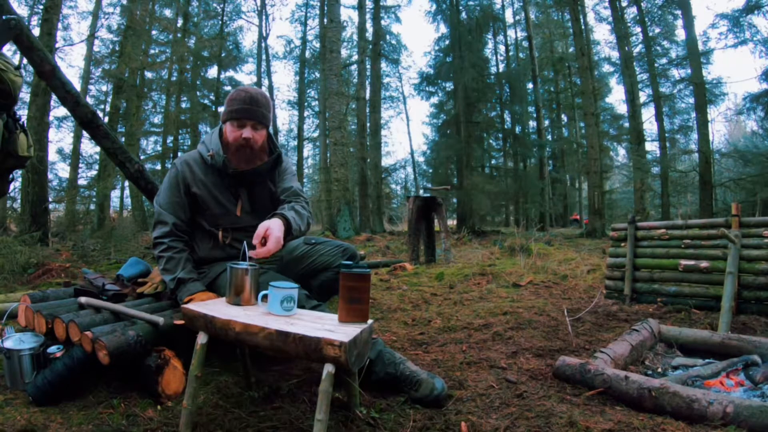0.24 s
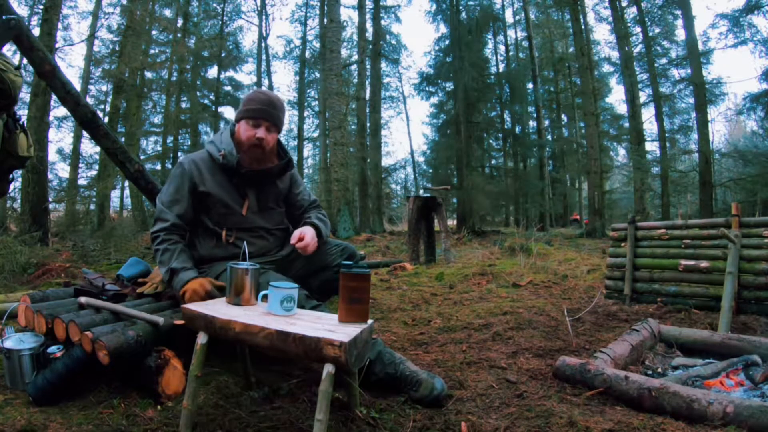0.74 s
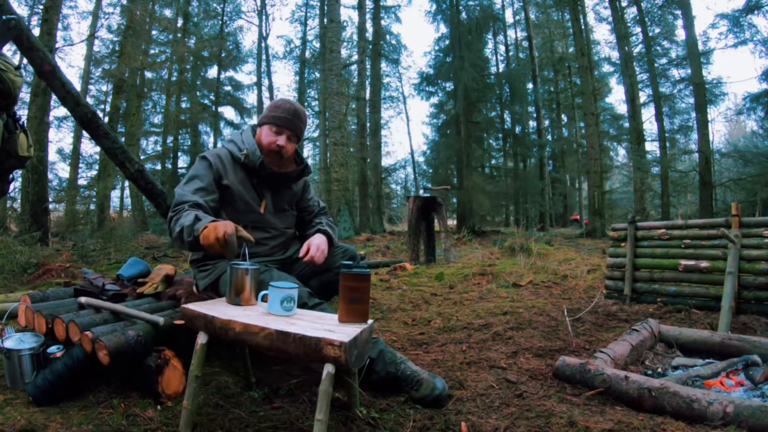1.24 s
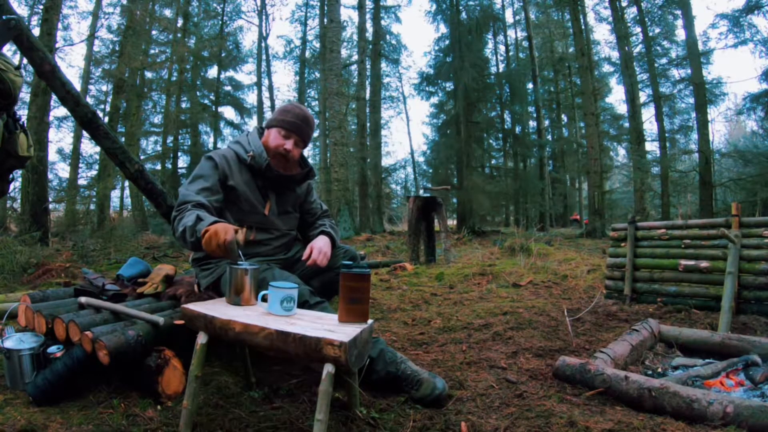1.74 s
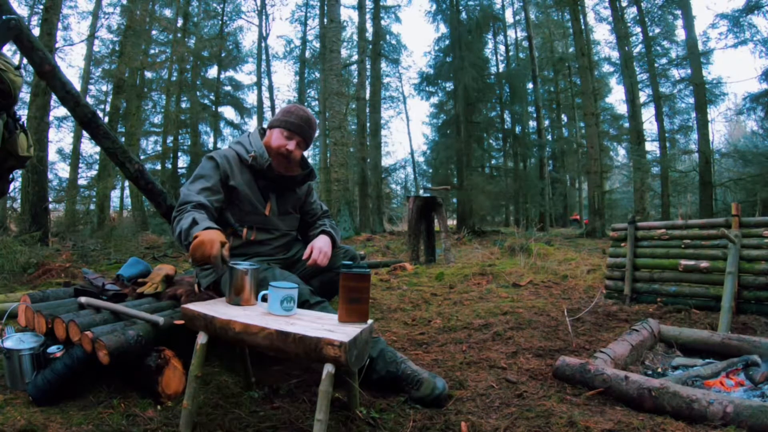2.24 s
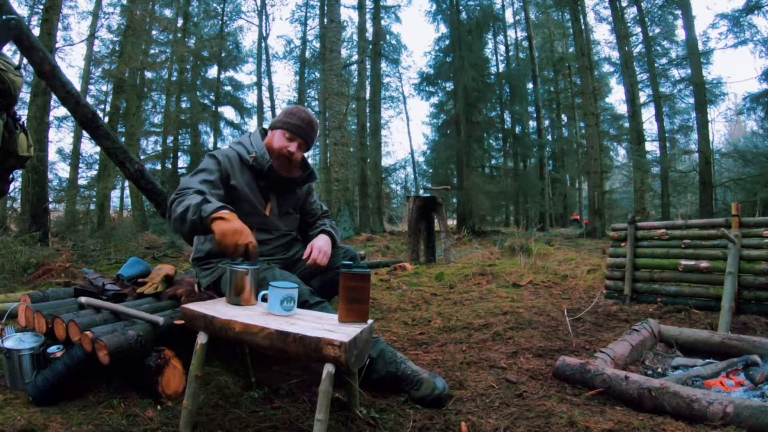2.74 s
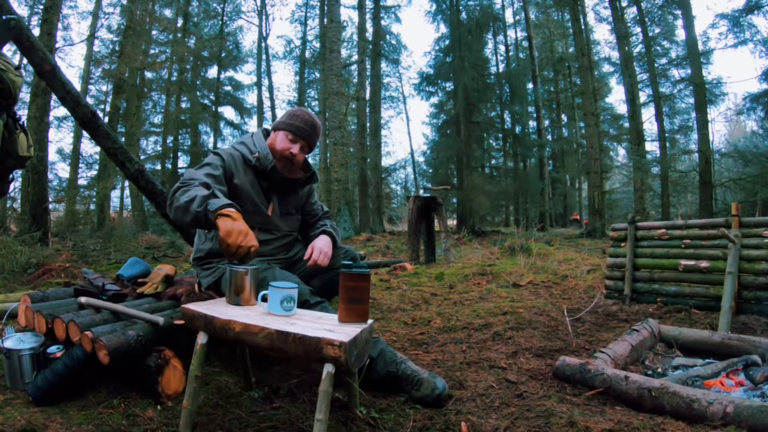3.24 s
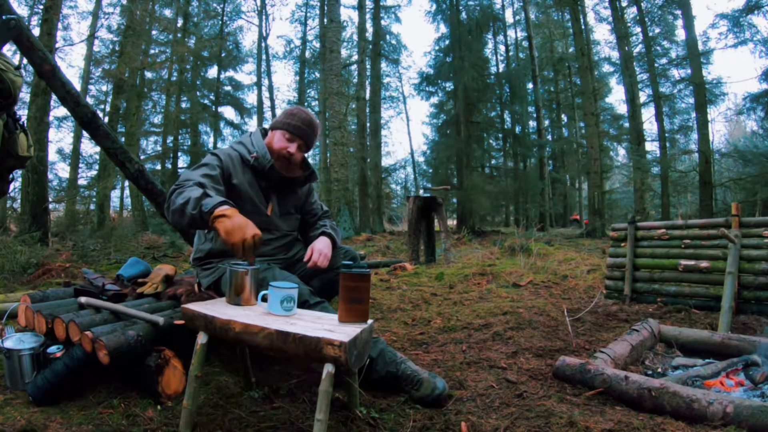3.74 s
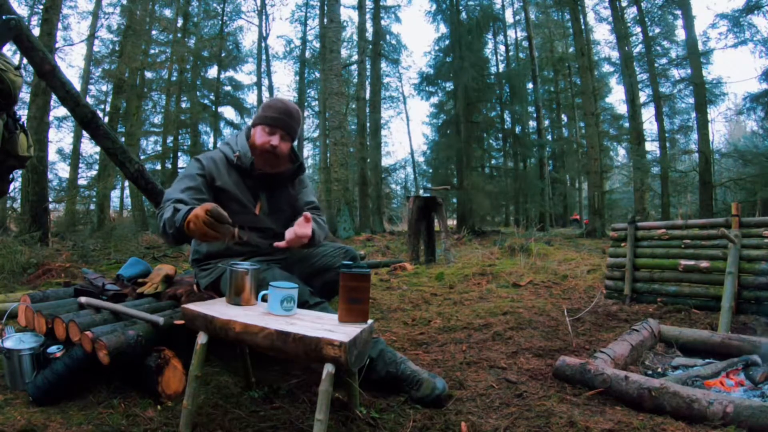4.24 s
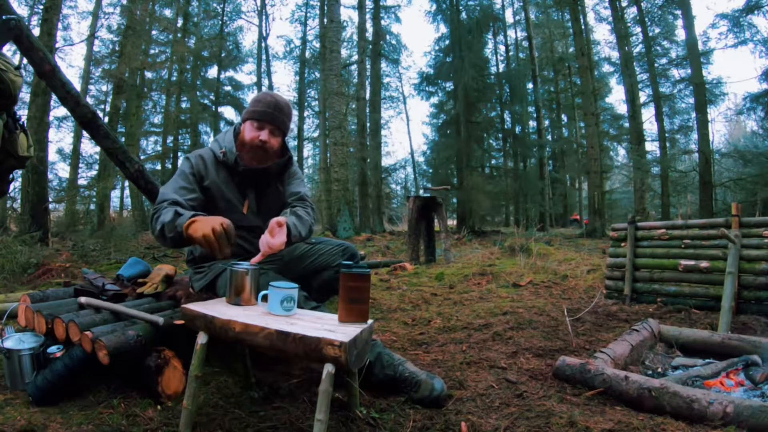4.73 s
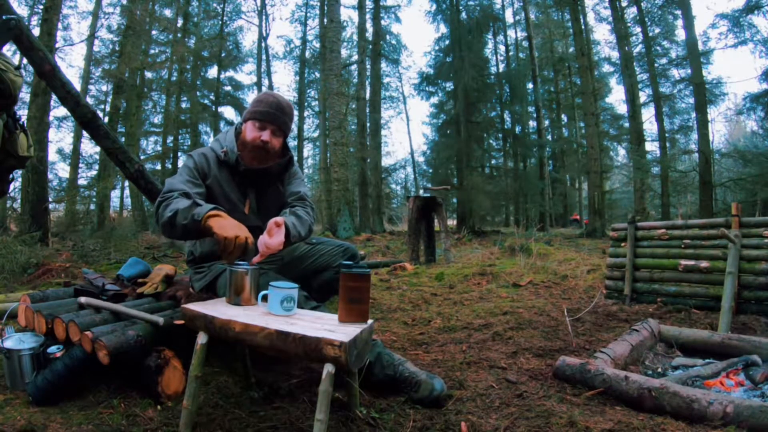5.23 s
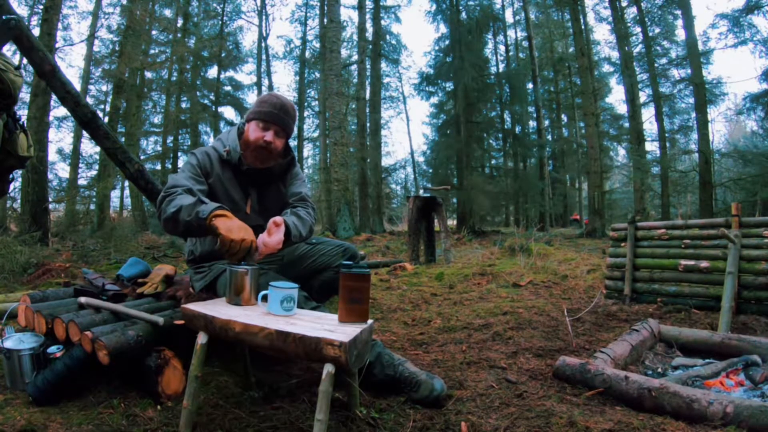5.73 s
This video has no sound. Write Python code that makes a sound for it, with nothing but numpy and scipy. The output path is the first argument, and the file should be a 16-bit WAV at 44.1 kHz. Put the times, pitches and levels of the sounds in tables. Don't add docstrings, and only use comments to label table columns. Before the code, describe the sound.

A loose spoon clatters loudly into a steel mug, then stirs with irregular dull clinks and knocks over a low distant engine rumble and wind buffets.

```python
import sys
import numpy as np
from scipy import signal
from scipy.fft import rfft, irfft
from scipy.io import wavfile
from scipy.ndimage import uniform_filter1d

SR = 44100
rng = np.random.default_rng(int(sys.argv[2]) if len(sys.argv) > 2 else 0)


def wav_record(signal):
    frames = np.transpose(np.atleast_2d(signal))
    bounded = np.clip(frames, -1, 1)
    quanta = np.round(bounded * 32767).astype(np.int16)
    wavfile.write(sys.argv[1], SR, quanta)


def invert_db(x):
    u = np.asarray(x, float) / 20
    return 10 ** u


N = 263718

# freq_hz, density_db
ROAR_SPECTRUM = [(12, -44), (20, 2), (27, -11), (70, -18.5), (133, -30.5), (254, -34), (292, -34.5),
                 (510, -29), (570, -26), (754, -28), (891, -27.5), (1180, -29), (3400, -47), (11300, -50),
                 (15800, -54)]
# time_s, level_db
TRAFFIC_NEARNESS = [
    (0, -6),
    (.68, -4),
    (1.3, -4),
    (2.65, -2.5),
    (3.15, 0.5),
    (3.68, -0.7),
    (3.86, -2),
    (4.26, -3.5),
    (4.46, -4),
    (5.98, -5),
]
# freq_hz, level_db
ENGINE_ORDERS = [(21.3, -11), (42.6, -4), (64, 0), (85.3, -11.5), (128, -15.5), (383, -19), (766, -7.5),
                 (1150, -13)]
# centre_s, level_db, half_length_s
GUSTS = [
    (.5, -9, 0.46),
    (1.04, -11, 0.13),
    (1.395, -6.5, 0.33),
    (1.9, 5.5, 0.044),
    (2.297, -13, 0.049),
    (2.923, -1, 0.31),
    (4.31, -3.5, 0.38),
    (5.25, -8.5, 0.25),
    (5.643, -7, 0.07),
    (5.98, 16, 0.079),
]
# freq_hz, level_db
CLOTH_SPECTRUM = [(300, -3.5), (700, 4.5), (2400, 0), (4500, -8), (6800, -12), (8200, -6.5), (9400, -20),
                  (12300, -14.5), (16000, -20)]
# peak_s, level_db, rise_s, fall_s
RUBS = [
    (.626, -38.5, 0.14, 0.026),
    (.814, -28.5, 0.13, 0.097),
    (.99, -37.5, 0.041, 0.22),
    (4.09, -32, 0.068, 0.039),
    (4.33, -33.5, 0.29, .09),
]
# start_s, level_db, lowest_hz, hollow_hz, t60_s
SNAPS = [
    (1.2713, -24, 5000, 8500, .008),
    (3.1247, -20, 8000, 10000, 0.0067),
    (5.301, -7, 1800, 3100, 0.0084),
]
# freq_hz, level_db, t60_s
FREE_MODES = [(1244, -13, .066), (2480, -14, .08), (2676, -16, .16), (2900, -11, .07), (3031, -20, .15),
              (3219, -14, .14), (3350, -6, .06), (3490, -15, .12), (3698, -25, .25), (4355, -24, .27),
              (4388, -26, .25), (2180, -15, .07), (5033, -27, .13), (5303, -21, .11), (5819, -22, .19),
              (6050, -15, .08), (6525, -20, .1), (7160, -5, .065), (7332, -11, .089), (7500, -9, .063),
              (8086, -14, .073), (8884, -17, .24), (9019, -21, .19), (10860, -25, .2), (12200, -17, .05),
              (12700, -22, .11), (13070, -25, .19), (14450, -31, .12), (14950, -30, .11),
              (15470, -19, .087)]
# freq_hz, level_db, t60_s
HELD_MODES = [(2093, -12, .06), (2550, -4.5, .06), (2720, -6, .06), (2900, -10, .06), (3220, 5, .06),
              (3500, 0.5, .06), (4520, -3.5, .06), (5170, -5.5, .06), (6170, -1.5, .06), (6840, -15, .06),
              (7450, -3.5, .06), (8130, -3, .06), (9270, -10, .06), (12000, -9, .06), (12300, -3, .06),
              (14100, 0, .06), (15400, -3, .06)]
# start_s, length_s
DRAGS = [(.156, 0.017), (1.316, 0.0098), (2.441, 0.018), (2.735, 0.0072), (2.294, 0.011), (1.765, .055),
         (3.194, 0.0057), (3.40, 0.028), (3.805, 0.013), (3.0, .006), (1.993, 0.005), (3.67, 0.0085),
         (3.731, 0.004), (3.741, 0.007), (3.825, 0.013), (3.845, 0.013), (4.084, .004), (4.886, 0.011),
         (4.993, 0.023), (5.705, 0.014), (5.729, 0.009), (5.623, 0.007), (5.371, 0.006)]
# start_s, level_db, pitch_hz, t60_s
THUDS = [(.154, -19, 435, 0.1), (0.188, -11, 636, 0.049), (.804, -18.5, 762, 0.098),
         (1.311, -13.5, 1250, 0.02), (1.919, -22, 181, 0.06), (2.479, -23.5, 187, 0.034),
         (2.734, -12.5, 362, 0.03), (3.045, -23, 180, 0.022), (3.192, -14.5, 550, 0.061),
         (3.233, -19.5, 255, 0.028), (3.664, -17, 615, 0.064), (3.667, -21, 227, 0.053),
         (3.736, -11.5, 1280, 0.063), (3.802, -18, 450, 0.033), (3.823, -15, 495, 0.017),
         (3.829, -26, 184, 0.095), (4.884, -18.5, 399, 0.054), (4.991, -16.5, 725, 0.053),
         (5.005, -21.5, 1300, 0.057)]
# start_s, blow_db, brightness_db, low_mode_hz, high_mode_hz
KNOCKS = [(1.329, -25, -14, 3500, 6170), (1.993, -21, -4, 2900, 4950), (2.033, -27, -2, 3070, 7150),
          (2.42, -29, 0, 3530, 6200), (2.777, -21, -7, 3000, 6120), (2.999, -21, -4, 3220, 8130),
          (3.235, -33, 1, 3260, 7400), (3.36, -37, -14, 1880, 7400), (3.805, -24.5, -1, 3130, 5000),
          (4.946, -29, -4, 2680, 7230), (5.371, -30, -12, 2520, 7400), (5.705, -29, -5, 3340, 7540),
          (5.729, -18, -17, 2670, 7400)]
# start_s, blow_db, brightness_db, low_mode_hz, high_mode_hz
CLACKS = [
    (.0572, -20, .5, 3150, 7370),
    (.156, -17.5, -4, 3080, 8100),
    (1.315, -17, -0.5, 3135, 6070),
    (1.924, -27.5, 4.5, 3220, 7280),
    (2.441, -34.5, 11, 3970, 8350),
]
# start_s, blow_db, brightness_db, low_mode_hz, high_mode_hz
PINGS = [
    (.7916, -36, 16, 3220, 7450),
    (.808, -23, -6, 1690, 7350),
    (1.765, -37.5, -20, 3090, 7400),
    (2.294, -33, -5, 2640, 6020),
    (3.67, -20.5, 1.5, 2530, 7180),
    (4.8845, -22, -3.5, 2595, 7820),
    (5.6225, -34, -12, 2630, 7400),
    (5.741, -31, 6, 2580, 6370),
]
# start_s, blow_db, brightness_db, low_mode_hz, high_mode_hz
SLAMS = [
    (2.7345, -9.5, -5, 2440, 6040),
    (3.192, -14.5, -9, 2720, 7830),
    (3.7403, -7, -3, 2510, 7940),
    (4.103, -20, -6, 2670, 7320),
]
# start_s, blow_db, brightness_db, low_mode_hz, high_mode_hz
TICKS = [
    (3.045, -14.5, -5, 3385, 6730),
    (3.062, -29, 1, 2930, 8690),
    (3.7304, -15, -1.5, 3820, 5020),
    (5.754, -13.5, -4, 2690, 7600),
]
# start_s, blow_db, brightness_db, low_mode_hz, high_mode_hz
SCRAPES = [
    (3.397, -29.5, -7, 2130, 5170),
    (3.432, -20.5, -3.5, 2800, 4840),
    (3.825, -18.5, -1, 2820, 4870),
    (3.844, -23, -4, 2980, 7210),
    (4.084, -25, -18, 2150, 7400),
    (4.9915, -20, -3, 3260, 5170),
]

# low_ring_db and high_ring_db re clatter, top_db re high modes, other_low_db, t60_share
KNOCK, CLACK, PING = (-7.5, -11, -11, -3.5, 1.76), (-4, -4, -8, -2.5, 1.4), (7, -6, -7, -7.5, 1.2)
SLAM, TICK = (-6, -7.5, -10, -10, 1.3), (-2.5, -5, 0, -2.5, .75)
SCRAPE = (-7.5, -11, -12, -1.5, 1.5)
BELLY_HZ, WALL_HZ, TIP_HZ = 2642, 3500, 12250
BELLY_T60_S, WALL_T60_S, RIM_T60_S, TIP_T60_S = 0.053, 0.051, 0.072, 0.058


def evened(x):
    return x / np.sqrt(np.mean(x ** 2) + 1e-20)


def peaked(x):
    return x / abs(x).max()


def read(points, hz):
    f, value = np.transpose(points)
    return np.interp(np.log(hz + 1), np.log(f + 1), value)


def follow(rows):
    return np.interp(np.arange(N) / SR, *np.transpose(rows))


def add(mix, start_s, sound):
    part = mix[round(start_s * SR):][:len(sound)]
    part += sound[:len(part)]


def coloured(spectrum, patchy_db, flicker_db):
    frames, hz = N // 256 + 5, np.fft.rfftfreq(1024, 1 / SR)
    real, imag, patches = rng.standard_normal((frames, 513, 3)).T
    patches = uniform_filter1d(patches, size=10, axis=0)
    patches = evened(uniform_filter1d(patches, size=14, axis=1))
    flicker = rng.standard_normal(frames)
    level_db = read(spectrum, hz)[:, None] + patchy_db * patches + flicker_db * flicker
    bins = (real + 1j * imag) * invert_db(level_db)
    return evened(signal.istft(bins, nperseg=1024, noverlap=768)[1][:N])


def wander(rate_hz):
    bins = rfft(rng.standard_normal(N))
    return evened(irfft(bins / (1 + (np.fft.rfftfreq(N, 1 / SR) / rate_hz) ** 4), N))


def swells(rows):
    t = np.arange(N) / SR
    return sum(invert_db(db) * np.exp(-((t - peak_s) / np.where(t < peak_s, rise_s, fall_s)) ** 2)
               for peak_s, db, rise_s, fall_s in rows)


def ring(modes, drag_s=0, size=4000):
    hz, db, t60_s = np.transpose(modes)[:, :, None]
    t = np.arange(size) / SR
    phase = 2 * np.pi * rng.random(hz.shape)
    fade_db = -60 * np.maximum(t - drag_s, 0) / np.maximum(t60_s, .002)
    partials = invert_db(db + fade_db) * np.sin(2 * np.pi * hz * t + phase)
    return peaked(partials.sum(0))


def clatter(modes, lo_hz, hi_hz, t60_s, drag_s, size=4000):
    t, hz = np.arange(size) / SR, np.fft.rfftfreq(size, 1 / SR)
    humps = sum(invert_db(.7 * db) / (1 + ((hz - f) / (.05 * f)) ** 2) for f, db, _ in modes)
    edges = 1 / (1 + (lo_hz / (hz + 1)) ** 8) / (1 + (hz / hi_hz) ** 8)
    grains = rng.standard_normal(size) * np.sqrt(rng.exponential(1, size))
    contacts = irfft(rfft(grains) * (.4 + humps) * edges, size)
    tick = np.minimum(t / .0003, 1) * (1 + 1.2 * np.exp(-t / .0015))
    fade_db = -60 * np.maximum(t - drag_s, 0) / max(t60_s, .002)
    return peaked(contacts * invert_db(fade_db) * tick)


def road():
    bass_band = signal.butter(2, [22, 40], "band", fs=SR, output="sos")
    bass = evened(signal.sosfilt(bass_band, rng.standard_normal(N)))
    air = coloured(ROAR_SPECTRUM, patchy_db=1.0, flicker_db=-0.08)
    hiss = signal.sosfiltfilt(signal.butter(2, 2600, "high", fs=SR, output="sos"), air)
    nearness_db = follow(TRAFFIC_NEARNESS)
    roar = evened(air - hiss) * invert_db(nearness_db - 28) + evened(hiss) * invert_db(-42)
    turns_s = np.cumsum(1 + 0.00781 * wander(2.83)) / SR
    orders = sum(invert_db(db + 1.78 * wander(6.9)) * np.sin(2 * np.pi * (hz * turns_s + rng.random()))
                 for hz, db in ENGINE_ORDERS)
    return roar + invert_db(-37.0) * bass + invert_db(0.94 * nearness_db - 31) * orders


def wind():
    swing = wander(3.8)
    swing = evened(swing - uniform_filter1d(swing, size=30000))
    calm_db = -27.5
    gusts = invert_db(calm_db) + swells([(s, db, half_s, half_s) for s, db, half_s in GUSTS])
    return 0.48 * np.tanh(swing * gusts / 0.63)


def jacket():
    return coloured(CLOTH_SPECTRUM, patchy_db=1.7, flicker_db=1.3) * swells(RUBS)


def embers():
    out = np.zeros(N)
    for start_s, db, lo_hz, hollow_hz, t60_s in SNAPS:
        puff = clatter([(hollow_hz, 6, t60_s)], 0.7 * hollow_hz, 1.6 * hollow_hz, 2.7 * t60_s, 0.0011)
        burst = clatter([(hollow_hz, -6, t60_s)], lo_hz, 13000, t60_s, 0.00091)
        add(out, start_s, invert_db(db) * peaked(burst + 0.48 * puff))
    return out


def dropped_spoon():
    out = np.zeros(N)
    start_s, ring_db, clatter_db, body_db = .1903, 2.1, 0.98, -10.5
    rattle = clatter(FREE_MODES, 2200, 14000, .12, 0.0058)
    body = clatter(FREE_MODES, 600, 7600, 0.063, 0.0095)
    damped = [(hz, db, 0.84 * t60_s) for hz, db, t60_s in FREE_MODES]
    add(out, start_s, invert_db(ring_db) * ring(damped, size=9000))
    add(out, start_s, invert_db(clatter_db) * rattle + invert_db(body_db) * body)
    return out


def blow(start_s, lo_hz, hi_hz, favoured_hz, t60_s, ring_db):
    drag_s = max([.002] + [length_s for s, length_s in DRAGS if abs(s - start_s) < .005])
    near = [(f, db + 3 * rng.standard_normal() - 6, t60_s) for f, db, _ in HELD_MODES if lo_hz < f < hi_hz]
    modes = near + [(favoured_hz, 0, 0.89 * t60_s)]
    build = np.minimum(np.arange(4000) / SR / (0.1 * drag_s), 1)
    tones = ring(modes, drag_s) * build
    return peaked(clatter(modes, lo_hz, hi_hz, t60_s, drag_s) + invert_db(ring_db) * tones)


def touch(row, kind):
    start_s, db, bright_db, low_hz, high_hz = row
    low_db, high_db, tip_db, other_db, t60_share = kind
    deep = low_hz < 2900
    belly_hz, wall_hz = (low_hz, WALL_HZ) if deep else (BELLY_HZ, low_hz)
    belly = blow(start_s, 1320, 2900, belly_hz, t60_share * BELLY_T60_S, low_db)
    wall = blow(start_s, 3050, 4540, wall_hz, t60_share * WALL_T60_S, low_db)
    rim = blow(start_s, 4200, 9250, high_hz, t60_share * RIM_T60_S, high_db)
    tip = blow(start_s, 8400, 16000, TIP_HZ, TIP_T60_S, ring_db=-4)
    low = belly + invert_db(other_db) * wall if deep else invert_db(other_db) * belly + wall
    return invert_db(db) * (low + invert_db(bright_db) * (rim + invert_db(tip_db) * tip))


def thud(pitch_hz, t60_s):
    modes = [(pitch_hz, 0, t60_s)]
    return peaked(ring(modes) + 1.07 * clatter(modes, 160, 1800, t60_s, 0.0062))


def stirring():
    out = np.zeros(N)
    kinds = ((KNOCKS, KNOCK), (CLACKS, CLACK), (PINGS, PING),
             (SLAMS, SLAM), (TICKS, TICK), (SCRAPES, SCRAPE))
    for rows, kind in kinds:
        for row in rows:
            add(out, row[0], touch(row, kind))
    for start_s, db, pitch_hz, t60_s in THUDS:
        add(out, start_s + .003, invert_db(db) * thud(pitch_hz, t60_s))
    return out


def clearing(x):
    t = np.arange(8000) / SR
    sparse = rng.choice([-1., 1.], 8000) * (rng.random(8000) < .05)
    taps = sparse * invert_db(-60 * t / .2) * (t > .002)
    return signal.fftconvolve(x, taps / np.linalg.norm(taps))[:N]


def scene():
    near = embers() + dropped_spoon() + stirring()
    returns = invert_db(-17) * clearing(near)
    return (road() + wind() + jacket() + near + returns)[None]


def band_limit(x):
    return signal.sosfilt(signal.butter(12, 16460, fs=SR, output="sos"), x)


def record(dry):
    limited = signal.oaconvolve(dry, signal.firwin(401, 15800, fs=SR)[None], "same")
    return band_limit(np.clip(limited, -1, 1))


dry = scene()
out = record(dry)
wav_record(out)
```